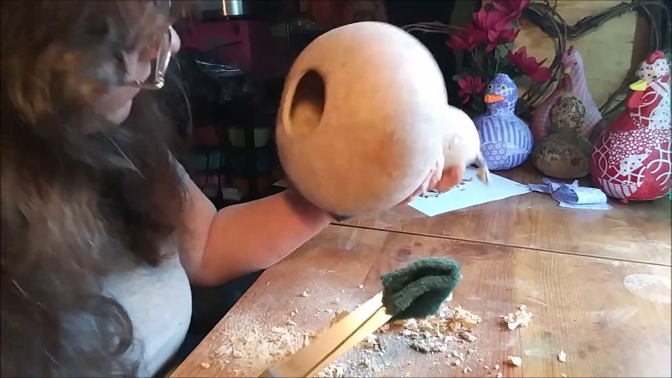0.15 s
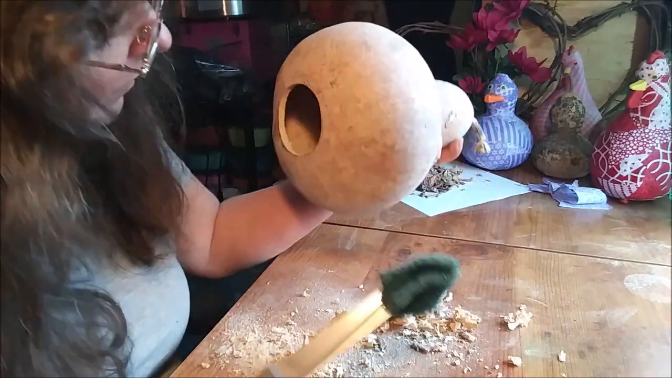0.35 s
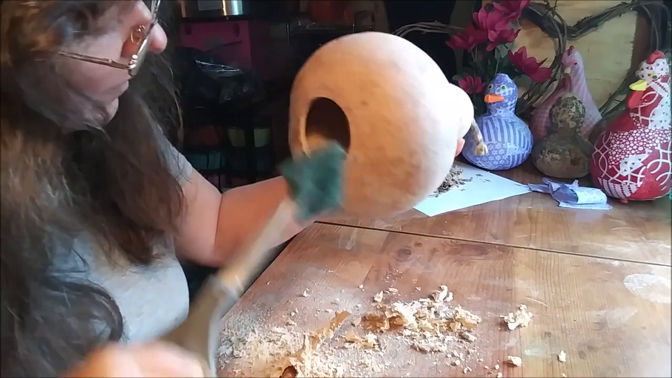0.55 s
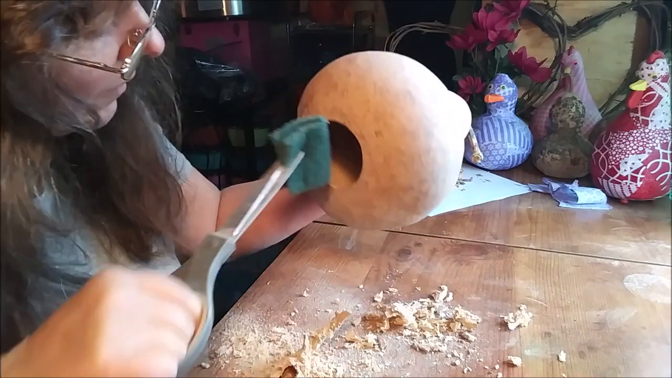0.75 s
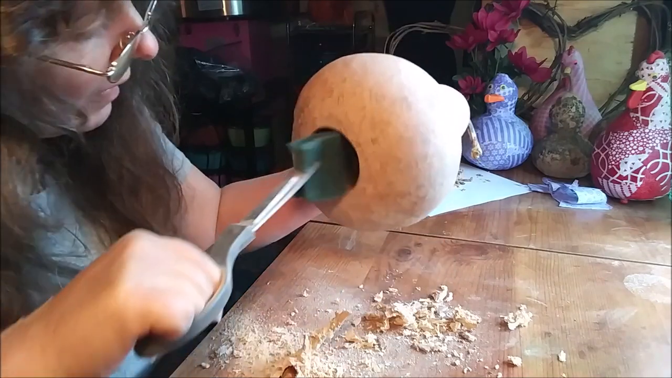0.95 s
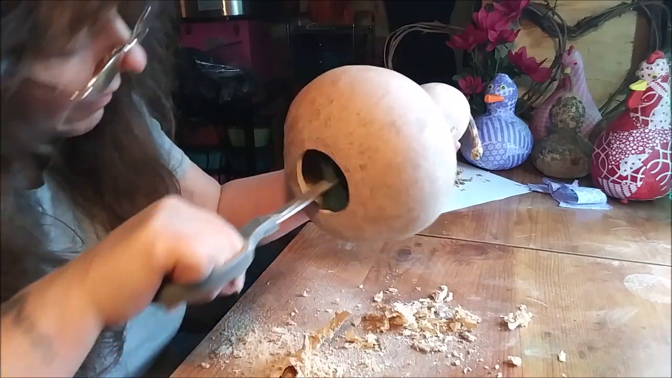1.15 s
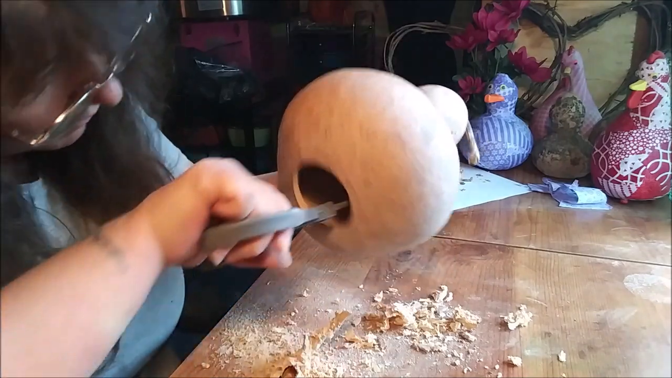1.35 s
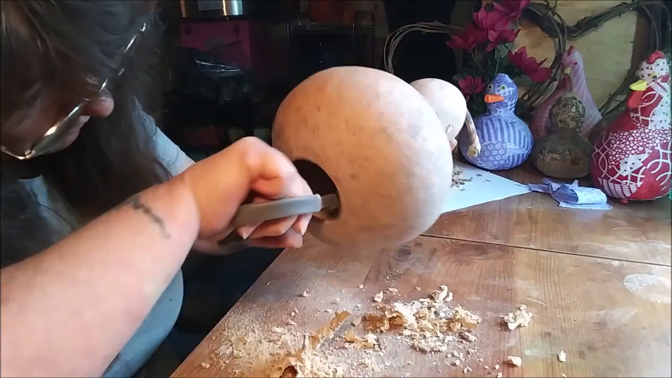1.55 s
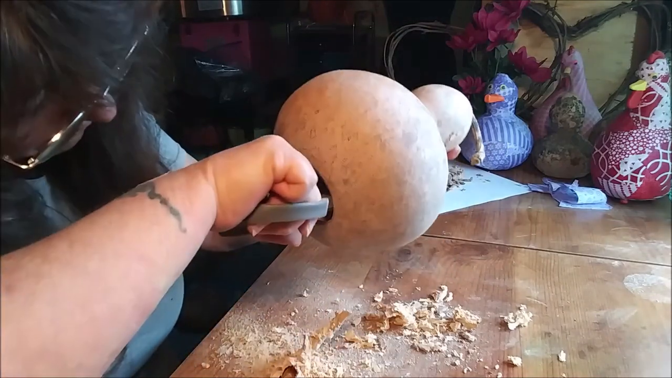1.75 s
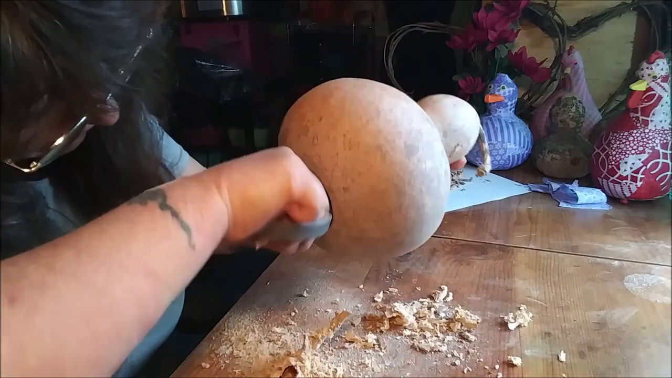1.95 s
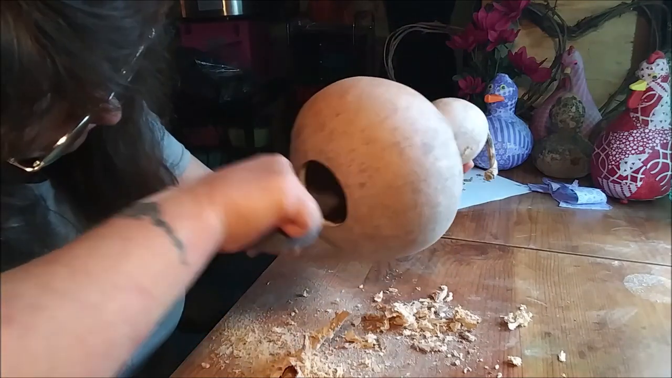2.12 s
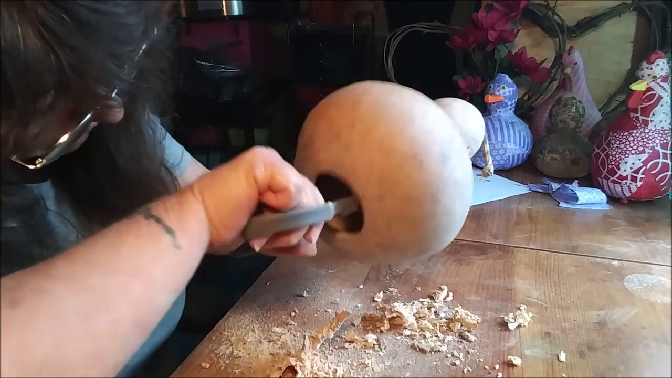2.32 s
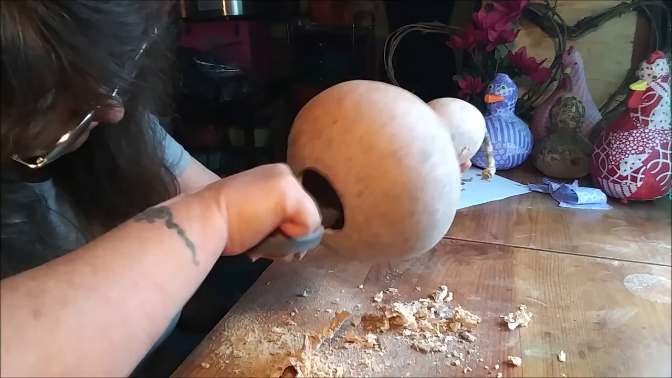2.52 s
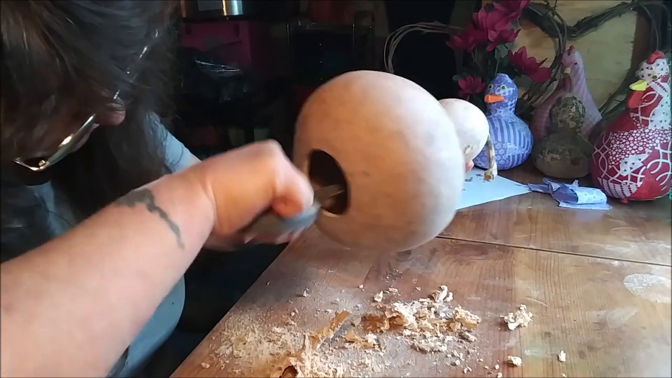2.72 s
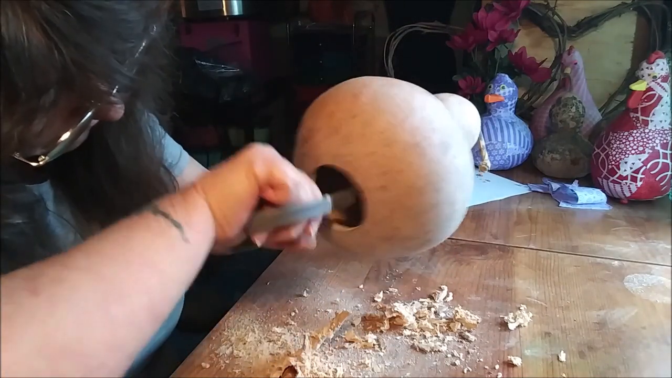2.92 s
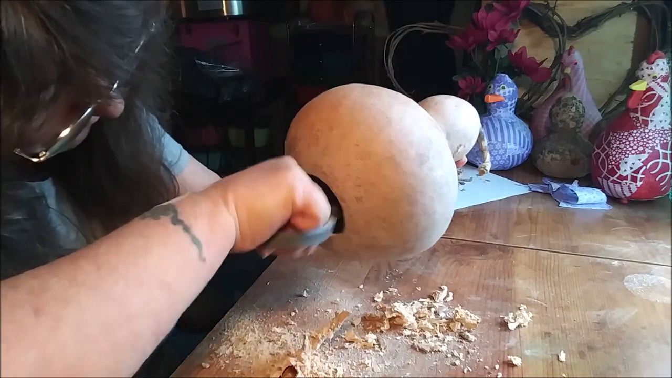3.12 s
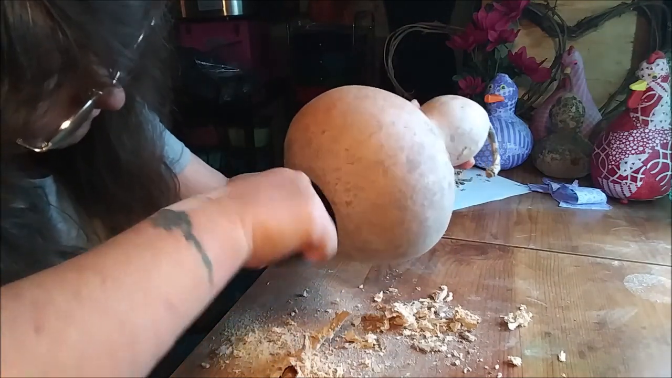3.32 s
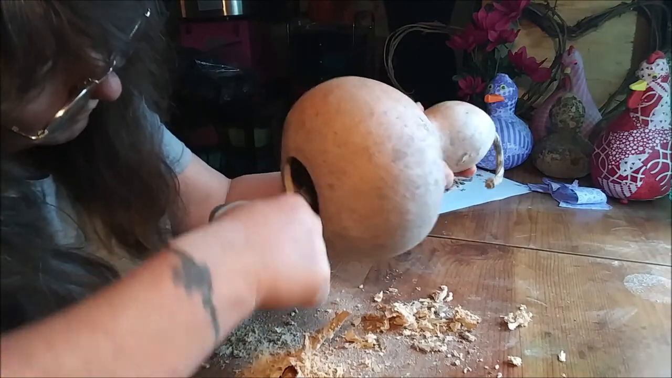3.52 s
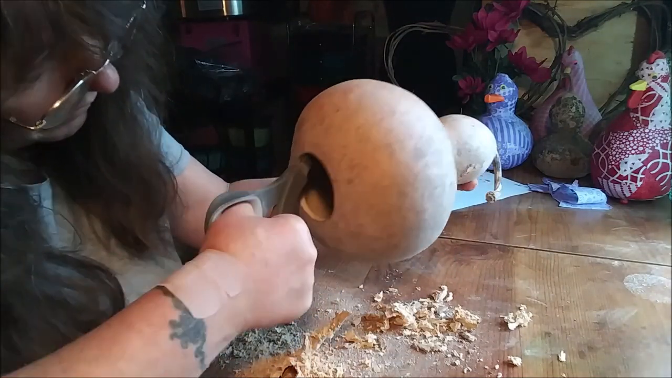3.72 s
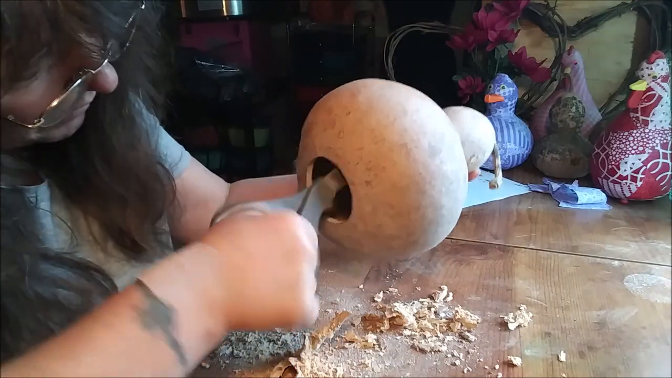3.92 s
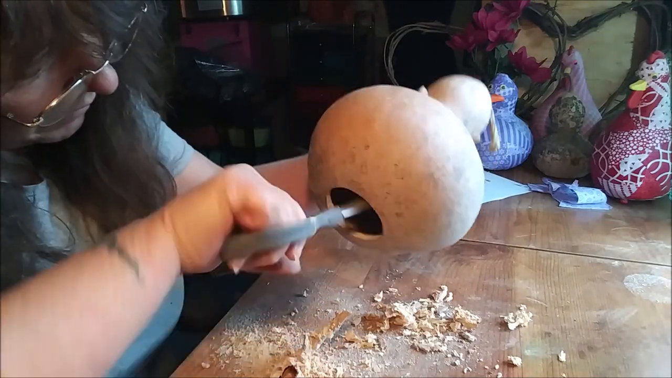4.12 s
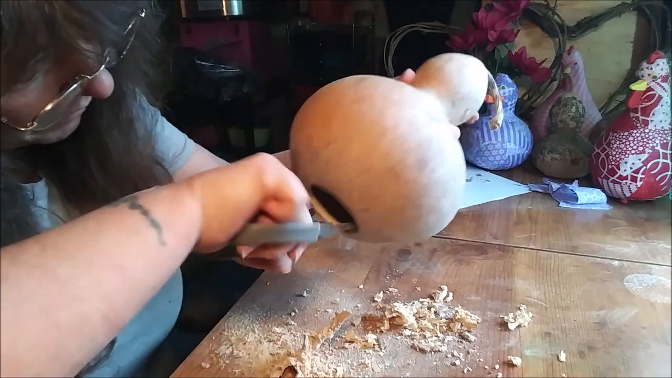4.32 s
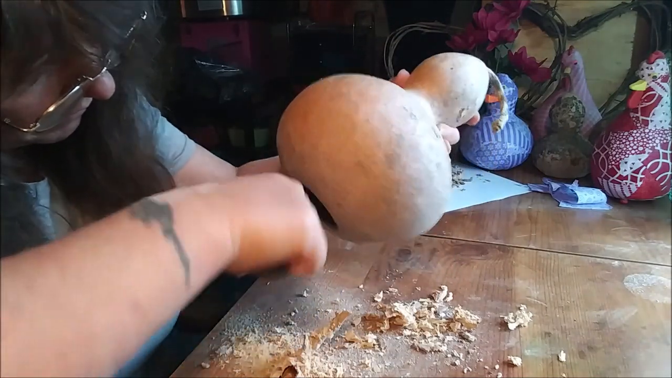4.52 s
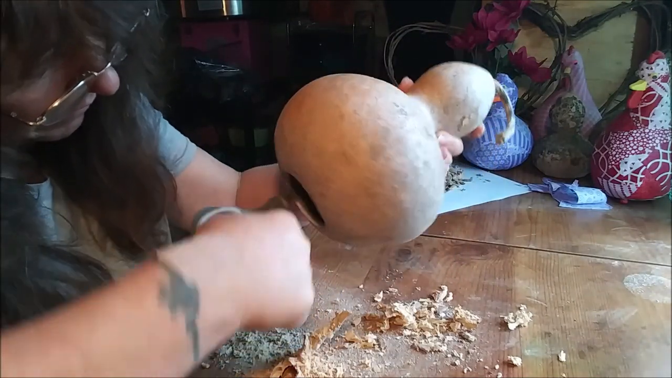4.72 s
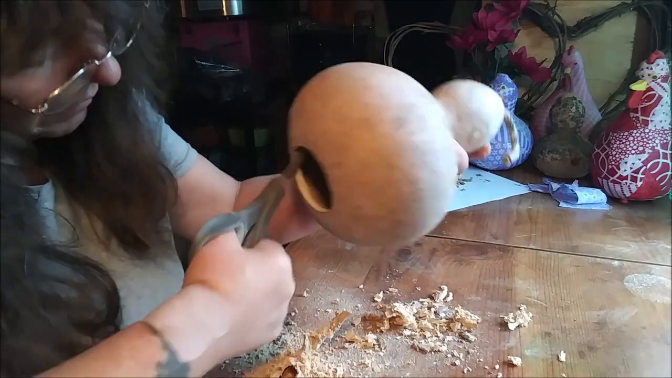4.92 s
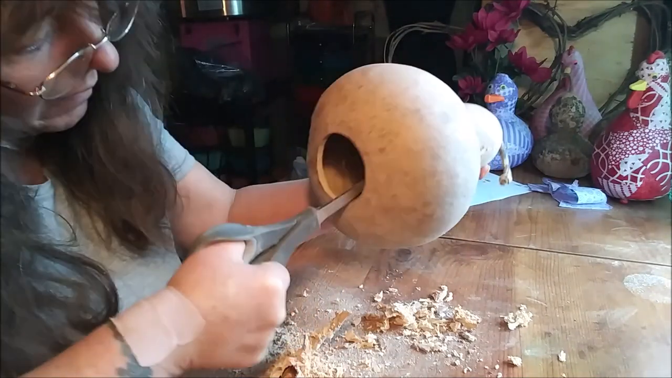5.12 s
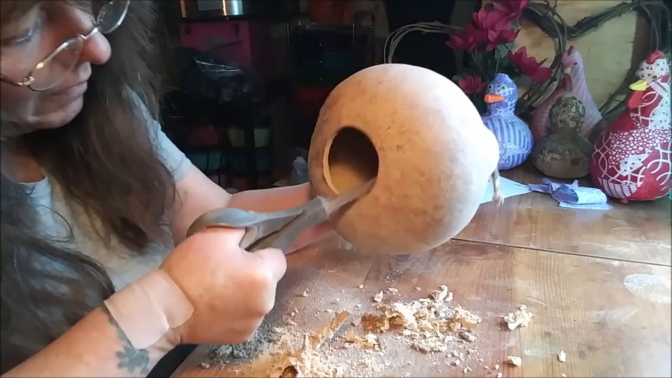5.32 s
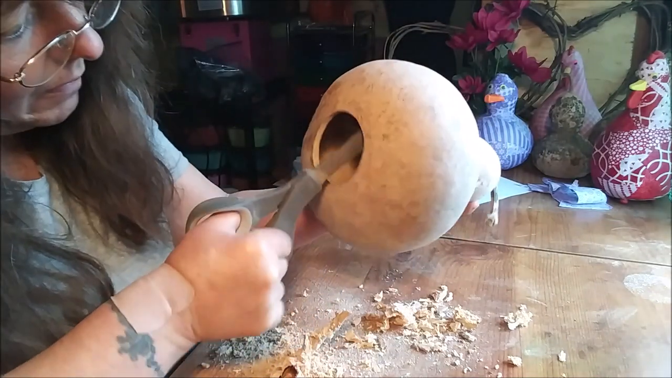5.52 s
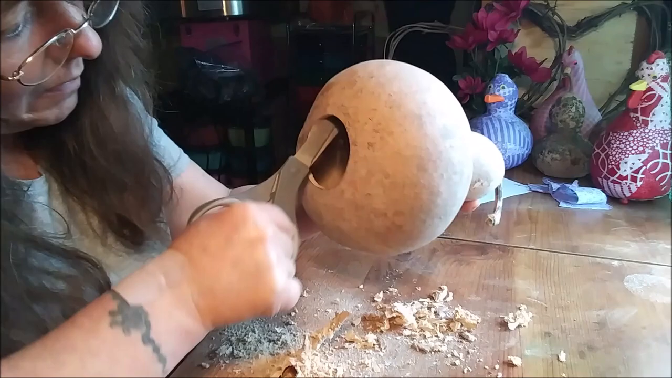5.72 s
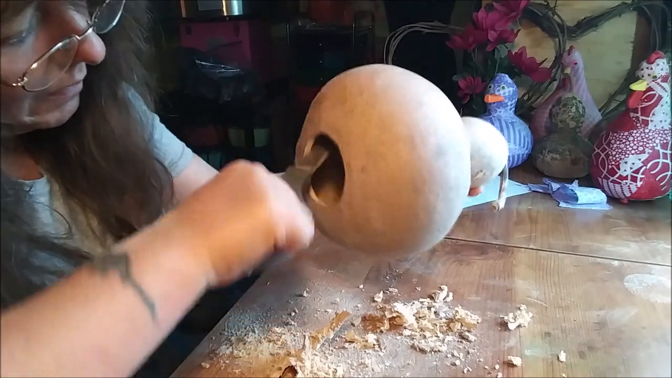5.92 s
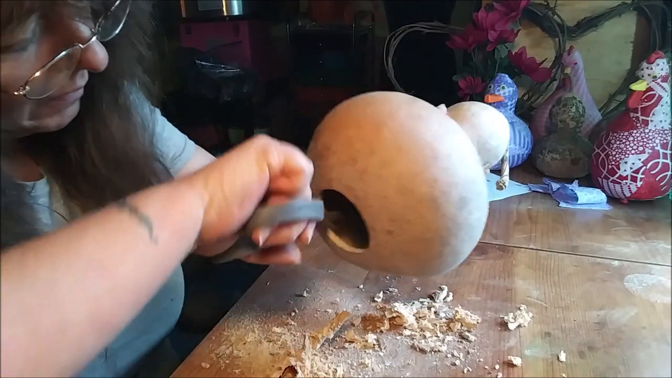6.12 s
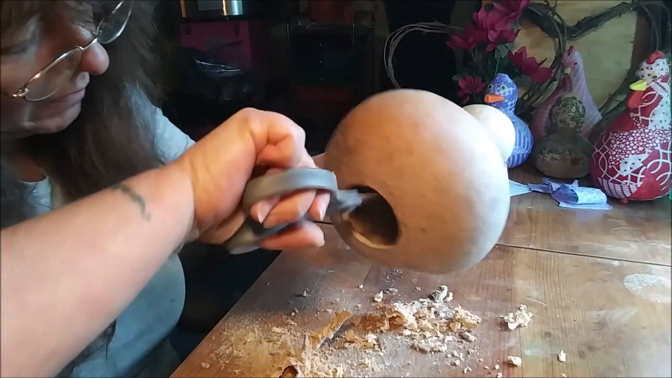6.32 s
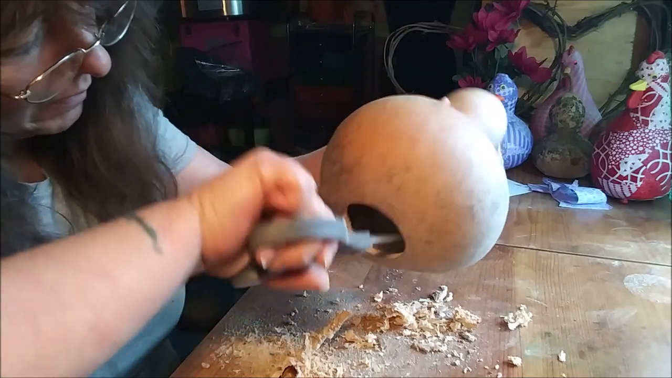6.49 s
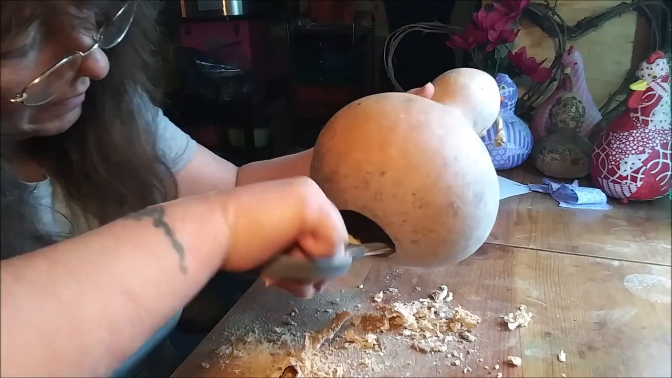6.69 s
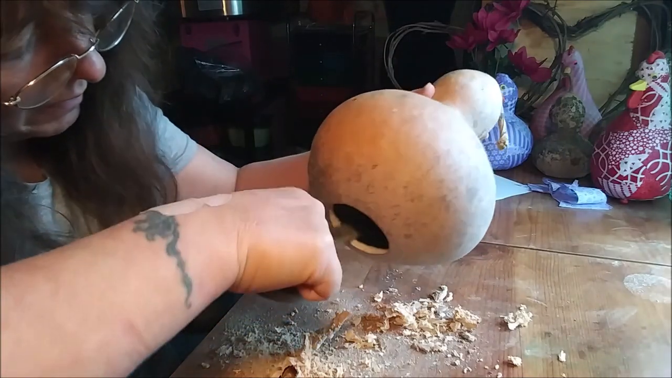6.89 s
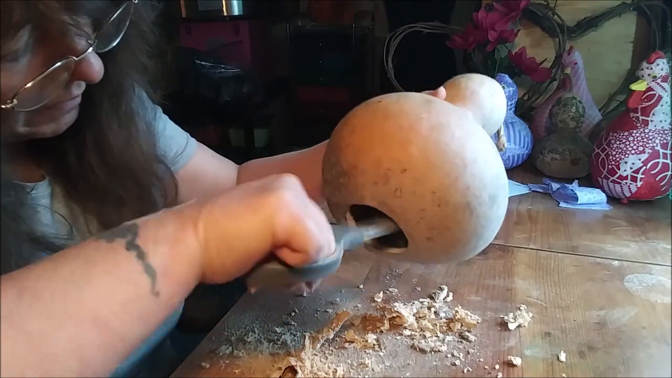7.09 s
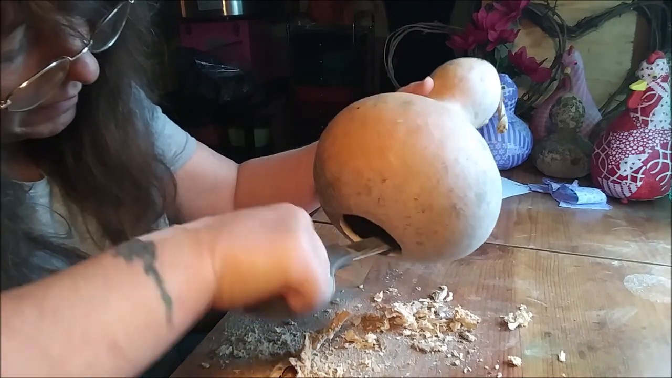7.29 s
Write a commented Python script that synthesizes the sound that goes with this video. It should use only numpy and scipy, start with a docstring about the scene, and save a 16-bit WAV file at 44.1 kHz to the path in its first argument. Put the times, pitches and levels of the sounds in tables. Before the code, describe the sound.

In a quiet small room, a hand faintly slides over a dry gourd. A scouring pad then enters its hole and scrubs the inner wall in quick, uneven, hissing strokes with a hollow ring. Steel scissors rasp on the rim and knock the hard shell, sparsely at first, then more often and louder, ending with a short scrape. Close small microphone, little reverberation.

```python
"""In a small room, a scouring pad held in scissors scrubs the inside of a hollow dried gourd.
The gourd is first turned in the hand: skin slides, as gritty noise, on the dry outside.
Then the pad hisses to and fro: bursts of fibre noise ring in the cavity and in a gliding air pocket.
The steel blades rasp on the rim of the hole, where stick-slip noise drives the shell's modes,
and knock against the hard shell, each blow a burst of ringing modes and short woody noise."""
import sys
import numpy as np
from scipy import signal
from scipy.fft import rfft, irfft, next_fast_len
from scipy.io import wavfile
from scipy.ndimage import uniform_filter1d, map_coordinates

SR = 44100
rng = np.random.default_rng(int(sys.argv[2]) if len(sys.argv) > 2 else 0)


def bounce(signal):
    """Save signal as a 16-bit WAV file at the path given by the first command-line argument."""
    frames = np.transpose(np.atleast_2d(signal))
    limited = np.clip(frames, -1, 1)
    pcm = np.round(limited * 32767).astype(np.int16)
    wavfile.write(sys.argv[1], SR, pcm)


N = 324135

# All levels are relative: each layer has a further gain where it is mixed.
# spectrum of the still air: [f/Hz, level/dB per Hz]
STILL_AIR = [(15, -37), (25, -27), (157, -4.5), (955, -16), (1320, -18), (1470, -21), (3130, -23),
             (4210, -25), (5230, -25.5), (7830, -31.5), (11100, -33.5), (13400, -50), (15800, -31.5)]
# steady hum tones: [f/Hz, level/dB rms]
HUM_TONES = [(60, -72.5), (68, -71.5), (1080, -74.5)]
# decay of the room by pitch: [f/Hz, t60/s]
ROOM_DECAY = [(150, 0.23), (1500, 0.31), (6000, 0.31), (14000, 0.23)]
# the hand sliding over the gourd: [middle t/s, held t/s, level/dB]
HAND_SLIDES = [(.08, .06, -68.5), (.28, 0.14, -66), (.53, 0.038, -63), (.65, 0.079, -62),
               (.83, 0.029, -65.5), (1.04, 0.018, -67)]
# spectrum of skin on the dry outside: [f/Hz, level/dB per Hz]
SKIN_COLOUR = [(59, -25), (100, 6.5), (205, -5), (238, -13), (327, -4), (422, -21), (500, -7.5),
               (905, -16.5), (1050, -16.5), (2020, -13.5), (15800, -36.5)]
# ringing modes of the gourd's shell: [f/Hz, peak level/dB, t60/s]
SHELL_MODES = [(130, -13, 0.044), (180, -9.5, 0.078), (199, -15.5, 0.13), (251, -13.5, 0.16),
               (288.4, -5.5, 0.12), (329.5, -9.5, 0.12), (390, -14, 0.042), (469, -23, 0.083),
               (517.7, -8, 0.11), (590, -13.5, 0.088), (683, -27, 0.081), (687, -30.5, 0.024),
               (774, -17.5, 0.13), (865, -19.5, 0.063), (1229, -10.5, 0.25), (1363.3, 4, 0.047),
               (1383, 1.5, 0.05), (1428.5, 5, 0.071), (1530, -12.5, 0.039), (2000, -3, 0.018),
               (2120, -3, 0.058), (2110, -9.5, 0.13), (2250, -9, 0.027), (2582, 0, 0.054),
               (2686, -11, 0.091), (2790, -3, 0.03), (3020, -6.5, 0.039), (3227, -4.5, 0.063),
               (4300, -18, 0.21), (5320, -17.5, 0.051)]
# the scissors striking the shell: [t/s, level/dB, hardness/dB (padded below 0, bare steel above),
# squareness (0 glancing, 1 head-on)]
KNOCK_EVENTS = [(1.238, -47, 14, 0), (1.373, -41.5, -3, 0.49), (1.535, -32.5, 1.5, 0.41),
                (1.672, -34.5, -3.5, 0.049), (1.787, -41, -2, 0), (1.933, -41, 12, 0),
                (2.051, -31.5, 9.5, 0), (2.079, -39, -5, 0.73), (2.594, -41.5, -3, 0),
                (2.702, -32.5, 3.5, 0.26), (2.732, -31.5, 3.5, 0.054), (3.829, -33.5, 4, 0.58),
                (3.875, -33.5, -7, 0.76), (4.192, -35.5, -1.5, 0.65), (4.348, -32, 4, 0.34),
                (4.898, -30, -1, 0.4), (5.141, -31.5, 3, 1), (5.266, -41.5, 14, 0.84),
                (5.284, -29, -0.5, 0.32), (5.449, -33, 6, 0.53), (5.469, -30, 7.5, 0.31),
                (5.547, -25.5, 9, 0.34), (5.565, -28.5, 10.5, 0.056), (5.745, -19.5, -2, 0.32),
                (5.854, -30, -7.5, 0.5), (5.949, -31.5, -2.5, 0.058), (6.042, -27.5, .5, 0.22),
                (6.235, -30, 1, 0.31), (6.429, -31.5, 6.5, 0.96), (6.634, -31.5, -2, 0.18),
                (6.921, -32.5, -4, 0.33), (7.02, -38, 5.5, 0.37), (7.124, -25.5, 1.5, 0.79),
                (7.142, -27.5, 0.5, 0.53)]
# registers of a blow, from thump to clack: [low f/Hz, high f/Hz, nominal t60/s, noise share (ratio)]
BLOW_REGISTERS = [(104, 360, 0.089, 0.54), (415, 870, 0.037, 1.1), (1177, 1550, 0.047, 0.29),
                  (1820, 4540, 0.057, 0.84)]
# how each register answers a blow: [level/dB, dB per dB of hardness, dB gained head-on]
REGISTER_ANSWER = [(0.5, -1, 1), (-16, 0, 30.5), (-3.5, .5, 14), (-1, 1, -2)]
# the tool dragging on the rim: [middle t/s, held t/s, level/dB]
RIM_SCRAPES = [(1.08, 0.015, -48), (1.141, 0.013, -48.5), (1.188, .008, -52.5), (1.246, 0.0072, -45.5),
               (2.064, 0.021, -40), (2.728, 0.0096, -34.5), (3.749, 0.029, -33), (3.774, 0.0033, -24.5),
               (3.876, 0.033, -29), (4.213, 0.0031, -26.5), (4.244, 0.013, -26.5), (4.473, 0.027, -36.5),
               (4.598, 0.037, -44.5), (4.828, 0.071, -42.5), (4.873, 0.0022, -38), (4.937, .002, -38.5),
               (4.988, 0.0017, -42.5), (5.194, 0.029, -31.5), (5.28, 0.021, -36), (5.452, .002, -29.5),
               (5.553, 0.012, -26), (5.64, .01, -27), (5.737, 0.013, -28.5), (5.858, 0.046, -44),
               (6.056, 0.028, -36), (6.111, 0.0035, -36.5), (6.449, 0.008, -31.5), (6.517, 0.033, -30.5),
               (6.768, 0.04, -42), (6.884, 0.05, -38.5), (6.986, 0.014, -45), (7.164, 0.026, -26.5),
               (7.308, 0.015, -46)]
# spectrum of the rasping edge and of a knock's crack: [f/Hz, level/dB per Hz]
RASP_COLOUR = [(60, -9.5), (150, 0), (600, -6), (1000, -24), (1900, 4.5), (2800, 5), (4000, -1), (6000, 0),
               (8500, -12.5), (12000, -29), (15800, -48)]
# the upper mode driven hardest climbs with the steel's force: [scrape level/dB, f/Hz]
FAVOURED_MODE = [(-46, 1700), (-37.5, 2580)]
# strokes of the pad on the inner wall: [middle t/s, held t/s, level/dB]
PAD_STROKES = [(1.145, 0.079, -53), (1.246, 0.018, -44.5), (1.45, 0.072, -53), (1.541, 0.024, -46),
               (1.703, 0.051, -50.5), (1.839, 0.038, -43), (1.965, 0.021, -43), (2.01, 0.009, -37.5),
               (2.054, 0.0058, -26), (2.13, .01, -57), (2.183, .03, -47), (2.385, 0.025, -60.5),
               (2.458, 0.018, -39.5), (2.5, 0.009, -48), (2.576, 0.012, -27), (2.733, 0.059, -39.5),
               (2.94, .04, -65), (3.055, 0.094, -50.5), (3.146, .004, -32), (3.2, .018, -24.5),
               (3.325, .025, -37), (3.41, 0.048, -36), (3.52, .11, -38.5), (3.675, 0.058, -33.5),
               (3.77, 0.032, -36.5), (3.865, .04, -34), (3.975, 0.036, -60), (4.247, 0.005, -36),
               (4.355, 0.047, -46.5), (4.473, 0.041, -34), (4.598, .03, -37), (4.765, 0.25, -40),
               (4.985, 0.023, -49), (5.195, 0.035, -45.5), (5.279, .01, -45.5), (5.363, 0.026, -50),
               (5.473, 0.012, -42.5), (5.557, 0.0058, -30.5), (5.641, 0.025, -37), (5.733, 0.063, -38.5),
               (5.865, 0.032, -39.5), (5.945, 0.016, -36), (6.09, 0.11, -43), (6.235, 0.0042, -35),
               (6.324, 0.021, -40), (6.369, .003, -42.5), (6.461, .012, -47.5), (6.535, .004, -35),
               (6.65, 0.092, -52), (6.766, 0.027, -39), (6.883, 0.068, -36), (7.011, 0.029, -48),
               (7.185, .012, -38), (7.31, 0.046, -51)]
# how hard the pad leans on the wall: [t/s, hollow body level/dB]
PAD_LEAN = [(1.15, -10), (1.5, -0.5), (1.85, 8), (2.05, -5.5), (2.5, 1), (3.3, -3), (4.25, 1.5),
            (4.6, -1.5), (5.2, -1), (6.15, 3), (6.4, -9), (6.9, -0.5)]
# spectrum of the flicking fibres: [f/Hz, level/dB per Hz]
FIBRE_COLOUR = [(1000, -21.5), (1700, -10.5), (2300, -3), (3200, -2), (4700, -0.5), (6700, -2.5),
                (7800, -7), (8800, -8.5), (10000, -14), (11500, -21.5), (13000, -29), (15800, -28)]
# spectrum of the hollow body under the pressing pad: [f/Hz, level/dB per Hz]
HOLLOW_COLOUR = [(40, -36.5), (100, -2.5), (280, 1), (430, -5.5), (800, -9.5), (1050, -9.5), (1450, -3),
                 (2200, -18), (4000, -28)]
# air resonances of the cavity: [f/Hz, peak level/dB, t60/s]
CAVITY_MODES = [(299.3, 4, 0.13), (543, -4, 0.038), (1391, -0.5, 0.038), (1973, -1.5, 0.036),
                (2256, 0, 0.099), (2516, 1, 0.078), (2933, -1, 0.045), (3584, -0.5, 0.053),
                (4480, -4.5, 0.03), (6500, -6, 0.011), (7060, -2, .035)]
# gliding air pocket between pad and wall: [t/s, f/Hz, level/dB]
AIR_POCKET = [(1.5, 820, -46), (2.45, 882, -5), (2.75, 850, -8.5), (3.15, 904, -8.5), (3.4, 830, -10),
              (3.68, 803, -10), (4.0, 780, -35), (4.602, 905, -27), (4.9, 724, -9), (6.3, 765, -19),
              (6.85, 725, -16), (7.3, 730, -13)]

# time scales of attack and release, before the easing below
SLIDE_RISE_S, SLIDE_FALL_S = 0.0098, 0.0078
STROKE_RISE_S, STROKE_FALL_S = 0.0098, 0.019
SCRAPE_RISE_S, SCRAPE_FALL_S = 0.0071, 0.0098
# seconds of rise and fall added per second held: long movements are gentler, steel bites more abruptly
EASE, SCRAPE_EASE = 0.22, 0.09
STOP_S = 0.12  # a movement is at rest this long outside its hold
UNEVEN_DB, UNEVEN_PER_S = 1.79, 36  # the pad's effort wavers within a stroke
# slow strokes sound hollow, fast ones skim: hollow gain at a middling level, dB lost per dB above it
MIDDLING_STROKE_DB, HOLLOW_DB, HOLLOW_LOSS = -41, 2.5, 0.56
# light drags are bright, heavy ones dull: brightness at a middling level, dB lost per dB above it
MIDDLING_SCRAPE_DB, BRIGHT_DB, BRIGHT_LOSS = -32.5, 3, 0.31
SCRAPE_BODY_DB, SCRAPE_RING_DB = -7.5, -0.5  # the shell's low modes and nasal ring in every scrape
FAVOUR_DB, FAVOUR_WIDTH_HZ = 7.5, 46
THUMP_HZ, THUMP_SCATTER_HZ = 307, 8.3  # the low mode under the point of contact
# noise gate: opens on a treble band's level, cuts so many dB per dB below it, down to a limit
GATE_BAND_HZ, GATE_OPEN_DB = (1300, 4700), -68
GATE_SLOPE, GATE_DEPTH_DB, GATE_S = 7.5, 12, 0.015
TOP_HZ = 15830


def amp(db):
    """Decibels to linear gain."""
    return 10 ** (np.asarray(db) / 20)


def unit(x):
    """Scale to rms 1."""
    return x / np.sqrt(np.mean(x ** 2) + 1e-20)


def along(points, hz):
    """Interpolate (Hz, value) points on a log frequency axis."""
    f, v = np.transpose(points)
    return np.interp(np.log(hz + 1), np.log(f), v)


def fade(t, t60):
    """Exponential decay, 60 dB down at t60."""
    return np.exp(-np.log(1000) * t / t60)


def wobble(rate):
    """A smooth random curve, rate knots a second."""
    knots = rng.standard_normal(int(N * rate / SR) + 4)
    return map_coordinates(knots, [np.arange(N) * rate / SR])


def coloured(x, spectrum):
    """Filter x through a spectrum that keeps the power of white noise."""
    size = next_fast_len(N + 8192)
    gain = unit(amp(along(spectrum, np.fft.rfftfreq(size, 1 / SR))))
    return irfft(rfft(x, size) * gain, size)[:N]


def resonator(modes):
    """Impulse responses, one mode a row, of joint energy 1; a soft contact rounds the onset."""
    t = np.arange(SR // 6) / SR
    rows = np.array([amp(db) / t60 * fade(t, t60) * np.cos(2 * np.pi * hz * t) for hz, db, t60 in modes])
    rows = rows * (1 - fade(t, 0.0022))
    return rows / np.linalg.norm(rows.sum(0))


def through(x, response):
    """Ring a response with x."""
    return signal.fftconvolve(x, response)[:N]


def grit(rate, smooth):
    """Tiny catches of random size, rate a second, on a smooth rub; rms 1."""
    catches = (rng.random(N) < rate / SR) * rng.standard_normal(N)
    return unit(unit(catches) + smooth * rng.standard_normal(N))


def swell(u, held, rise, fall, shape, ease):
    """A movement's level, u seconds from its middle: attack, hold, release, rest."""
    outside = np.maximum(np.abs(u) - held / 2, 0)
    moving = np.clip(1 - (outside / STOP_S) ** 4, 0, 1)
    scale = np.where(u < 0, rise, fall) + ease * held
    return moving * np.exp(-(outside / scale) ** shape)


def around(s):
    """Sample indices of the third of a second on each side of a moment."""
    middle, reach = int(s * SR), SR // 3
    return np.arange(max(0, middle - reach), min(N, middle + reach))


def movements(rows, rise, fall, shape):
    """The level of a series of movements; overlapping ones add in power."""
    power = np.zeros(N)
    for s, held, db in rows:
        i = around(s)
        power[i] += (amp(db) * swell(i / SR - s, held, rise, fall, shape, EASE)) ** 2
    return np.sqrt(power)


def shifting(x, depth_db):
    """Broad peaks and hollows of colour that drift as the contact point moves."""
    z = signal.stft(x, nperseg=512)[2]
    field = rng.standard_normal(z.shape)
    for _ in range(2):
        field = uniform_filter1d(field, size=5, axis=0)  # across frequency
        field = uniform_filter1d(field, size=18, axis=1)  # across time
    return signal.istft(z * amp(depth_db * unit(field)))[1][:N]


def hollowed(x, share, t60):
    """Part of the sound bounces round the cavity before it leaves; the paths change as the tool moves."""
    t = np.arange(SR // 6) / SR
    paths = rng.standard_normal(size=(5, len(t))) * fade(t, t60)
    blend = np.array([wobble(4) for _ in paths])
    blend /= np.linalg.norm(blend, axis=0)
    echoes = sum(weight * through(x, path / np.linalg.norm(path)) for weight, path in zip(blend, paths))
    return (x + share * echoes) / np.hypot(1, share)


def background():
    """Still air as coloured noise, and a faint hum whose phase wanders slightly."""
    t = np.arange(N) / SR
    hum = np.zeros(N)
    for hz, db in HUM_TONES:
        hum += amp(db) * np.sqrt(2) * np.sin(2 * np.pi * hz * t + 1.2 * wobble(8.2))
    return hum + amp(-62.0) * coloured(rng.standard_normal(N), STILL_AIR)


def room(x):
    """A short diffuse tail that dies sooner in the treble than in the middle."""
    hz, t, z = signal.stft(rng.standard_normal(SR // 2), SR, nperseg=256)
    tail = signal.istft(z * fade(t, along(ROOM_DECAY, hz)[:, None]), SR)[1]
    tail = np.pad(tail, (int(0.006 * SR), 0))  # 6 ms before the first reflections
    return through(x, tail / np.linalg.norm(tail))


def hand():
    """Skin slides on the dry outside as the gourd is turned: gritty friction noise in slow swells."""
    level = movements(HAND_SLIDES, SLIDE_RISE_S, SLIDE_FALL_S, shape=2.4) * amp(0.67 * wobble(75.7))
    return level * coloured(grit(rate=2100, smooth=0.91), SKIN_COLOUR)


def blow_register(t, register, favoured_hz):
    """One register of a blow: the shell modes in its band, over band-limited woody noise."""
    low_hz, high_hz, life, noisy = register
    ring = np.zeros(len(t))
    for hz, level, t60 in SHELL_MODES:
        if low_hz < hz < high_hz:
            # the mode that moves most at the point of contact rings loudest
            favour_db = 9 * np.exp(-((hz - favoured_hz) / 20) ** 2)
            gain = amp(level + favour_db + rng.normal(0, 1.86)) * rng.choice([-1, 1])
            # struck modes die a little sooner than the table's t60
            ring += gain * fade(t, t60 * 0.87) * np.sin(2 * np.pi * hz * t)
    ring = ring * (1 - np.exp(-t * high_hz / 0.66))  # low registers take longer to build up
    band = signal.butter(3, [low_hz, high_hz], "bandpass", fs=SR, output="sos")
    wood = signal.sosfilt(band, rng.standard_normal(len(t)) * fade(t, life * 0.75))
    return unit(unit(ring) + noisy * unit(wood)) * np.sqrt(np.mean(fade(t, life) ** 2))


def knocks():
    """Steel strikes the shell; the blow's hardness and angle balance the registers from thump to clack."""
    t = np.arange(SR // 3) / SR
    out, cracks = np.zeros(N + SR), np.zeros(N + SR)
    for s, blow_db, hardness_db, squareness in KNOCK_EVENTS:
        levels_db = [blow_db + db + tilt * hardness_db + head_on_db * squareness
                     for db, tilt, head_on_db in REGISTER_ANSWER]
        favoured_hz = THUMP_HZ + THUMP_SCATTER_HZ * rng.standard_normal()
        start = round(s * SR)
        span = slice(start, start + len(t))
        for db, register in zip(levels_db, BLOW_REGISTERS):
            out[span] += amp(db) * blow_register(t, register, favoured_hz)
        # the first contact cracks briefly
        cracks[span] += amp(levels_db[-1] + 1.0) * fade(t, 0.018) * rng.standard_normal(len(t))
    return out[:N] + coloured(cracks[:N], RASP_COLOUR)


def blades():
    """The tool sticks and slips on the rim and drives the shell; each contact weights the modes anew."""
    slips = grit(rate=900, smooth=0.5) * amp(wobble(170))
    modes, mode_hz = resonator(SHELL_MODES), np.array(SHELL_MODES)[:, 0]
    lower, upper = mode_hz < BLOW_REGISTERS[1][1], mode_hz > BLOW_REGISTERS[-1][0]
    groups = (lower, ~lower & ~upper, upper)
    ring, edge = np.zeros(N + SR), np.zeros(N)
    for s, held, db in RIM_SCRAPES:
        i = around(s)
        envelope = swell(i / SR - s, held, SCRAPE_RISE_S, SCRAPE_FALL_S, shape=1.17, ease=SCRAPE_EASE)
        force = amp(db) * envelope
        bright_db = BRIGHT_DB - BRIGHT_LOSS * (db - MIDDLING_SCRAPE_DB)
        favoured_hz = np.interp(db, *np.transpose(FAVOURED_MODE))
        favour_db = FAVOUR_DB * np.exp(-((mode_hz - favoured_hz) / FAVOUR_WIDTH_HZ) ** 2)
        scatter_db = rng.normal(0, 3.5, len(SHELL_MODES))
        weights = amp(favour_db + scatter_db) * rng.choice([-1, 1], len(SHELL_MODES))
        parts = [(weights * group) @ modes for group in groups]
        body, nasal, high = [part / np.linalg.norm(part) for part in parts]
        response = amp(SCRAPE_BODY_DB) * body + amp(SCRAPE_RING_DB) * nasal + amp(bright_db - 6.0) * high
        sound = signal.fftconvolve(force * slips[i], response)
        ring[i[0]:i[0] + len(sound)] += sound
        edge[i] += force * amp(bright_db)
    rasp = hollowed(coloured(edge * slips, RASP_COLOUR), share=0.65, t60=0.055)
    return ring[:N] + amp(-10.5) * shifting(rasp, depth_db=1.5)


def effort():
    """Speed and pressure of the pad: the faster the stroke, the smaller the share of pressure."""
    pressed = [(s, held, db + HOLLOW_DB - HOLLOW_LOSS * (db - MIDDLING_STROKE_DB))
               for s, held, db in PAD_STROKES]
    uneven = amp(UNEVEN_DB * wobble(UNEVEN_PER_S))
    speed = uneven * movements(PAD_STROKES, STROKE_RISE_S, STROKE_FALL_S, shape=1.02)
    pressure = uneven * movements(pressed, STROKE_RISE_S, STROKE_FALL_S, shape=1.02)
    lean_db = np.interp(np.arange(N) / SR, *np.transpose(PAD_LEAN))
    return speed, pressure * amp(lean_db)


def pocket(x, width_hz):
    """A gliding resonance: the pitch of the trapped air follows the pad's place on the wall."""
    hz, t, z = signal.stft(x, SR, nperseg=1024)
    s, pitch, db = np.transpose(AIR_POCKET)
    peak = 1 / (1 + ((hz[:, None] - np.interp(t, s, pitch)) / width_hz) ** 2)
    return signal.istft(z * unit(peak) * amp(np.interp(t, s, db)), SR)[1][:N]


def pad():
    """Fibres flick over the inner wall; the hiss rings in the cavity, hollower when the pad presses."""
    speed, pressure = effort()
    flicks = grit(rate=2200, smooth=0.93) * amp(wobble(140))
    hiss = amp(-0.28) * hollowed(coloured(speed * flicks, FIBRE_COLOUR), share=0.48, t60=0.013)
    cavity_drive = np.sqrt(speed * pressure) * grit(rate=2400, smooth=0.94)
    cavity = amp(-8.5) * through(cavity_drive, resonator(CAVITY_MODES).sum(0))
    body = amp(-14.5) * coloured(pressure * grit(rate=1200, smooth=0.45), HOLLOW_COLOUR)
    air = amp(-6.5) * pocket(speed * grit(rate=2200, smooth=0.98), width_hz=53)
    return shifting(hiss + cavity + body, depth_db=1.5) + air


def scene():
    """The gourd's sounds, their room tail and the still room beneath."""
    gourd = hand() + pad() + blades() + knocks()
    return (gourd + amp(-12.5) * room(gourd) + background())[None]


def gated(x):
    """A noise gate turns the whole sound down when its treble band falls below the opening level."""
    window = int(GATE_S * SR)
    band = signal.sosfilt(signal.butter(2, GATE_BAND_HZ, "bandpass", fs=SR, output="sos"), x)
    level_db = 10 * np.log10(np.abs(uniform_filter1d(band ** 2, window)) + 1e-20)
    cut_db = np.clip(GATE_SLOPE * (GATE_OPEN_DB - level_db), 0, GATE_DEPTH_DB)
    return x * amp(-uniform_filter1d(cut_db, window))


def record(dry):
    """The recorder gates the pauses, the small microphone loses deep bass, and the top is cut sharply."""
    size = next_fast_len(N + 8192)
    thin = signal.sosfilt(signal.butter(4, 58, "highpass", fs=SR, output="sos"), gated(dry))
    kept = np.fft.rfftfreq(size, 1 / SR) < TOP_HZ
    return irfft(rfft(thin, size) * kept, size)[:, :N]


dry = scene()
out = record(dry)
bounce(out)
```